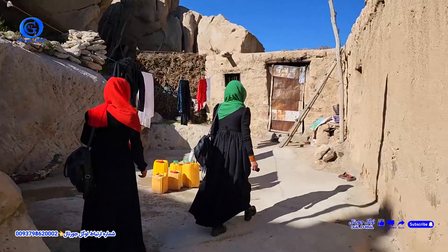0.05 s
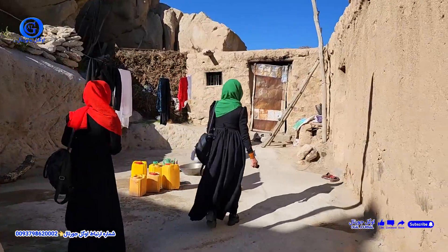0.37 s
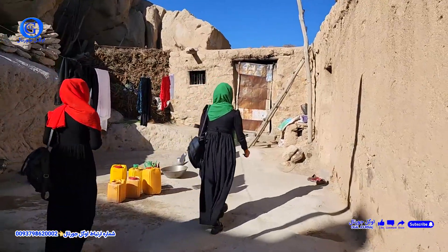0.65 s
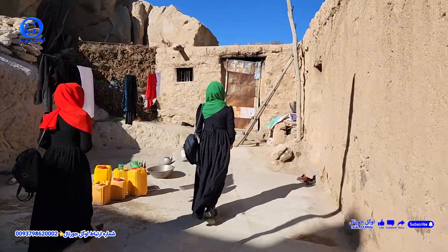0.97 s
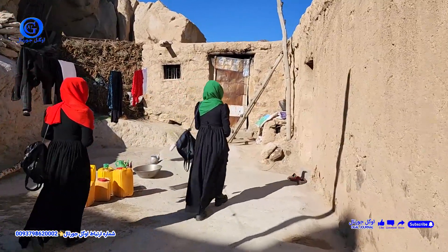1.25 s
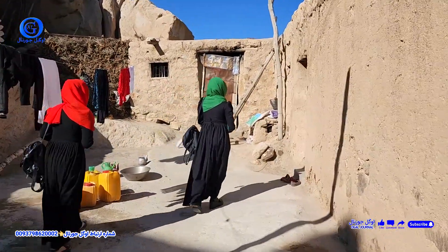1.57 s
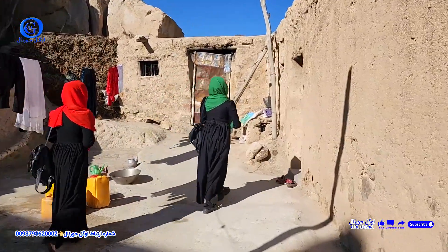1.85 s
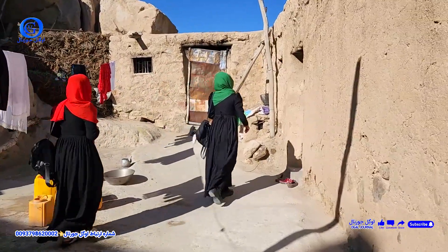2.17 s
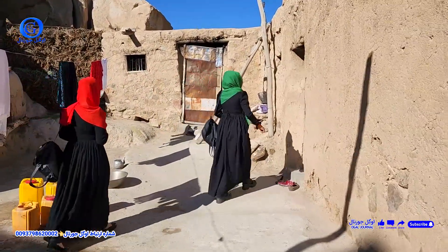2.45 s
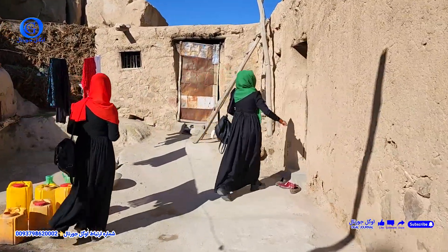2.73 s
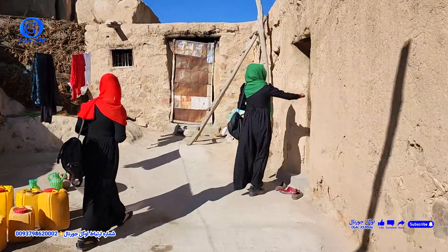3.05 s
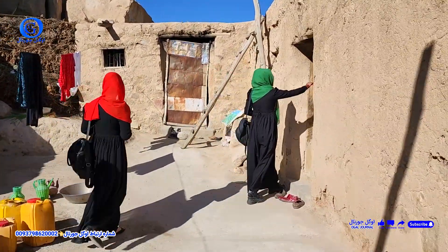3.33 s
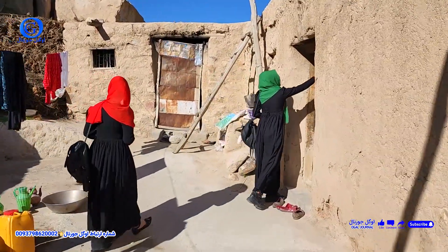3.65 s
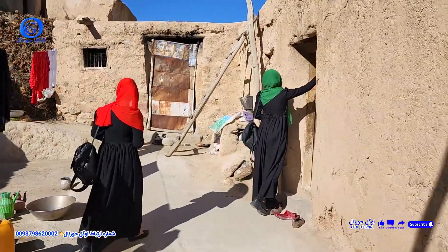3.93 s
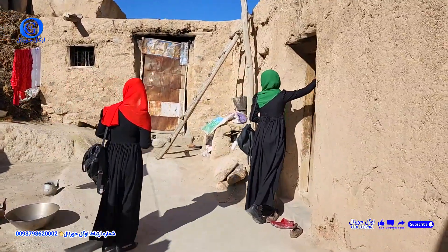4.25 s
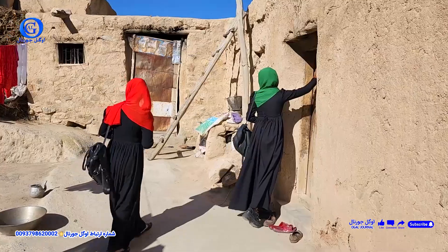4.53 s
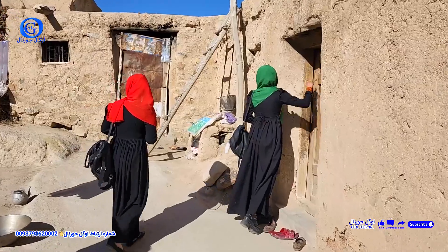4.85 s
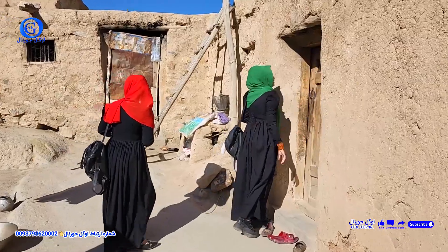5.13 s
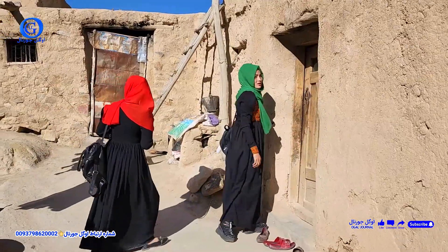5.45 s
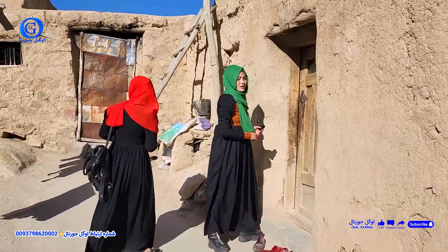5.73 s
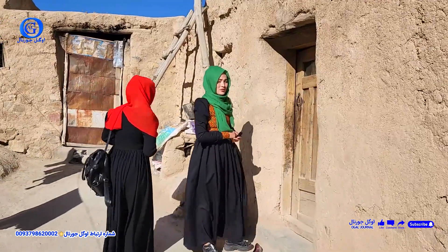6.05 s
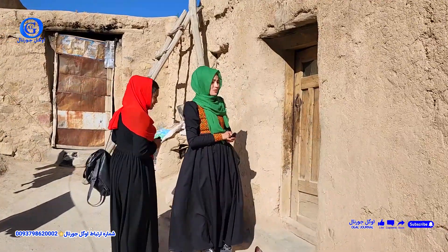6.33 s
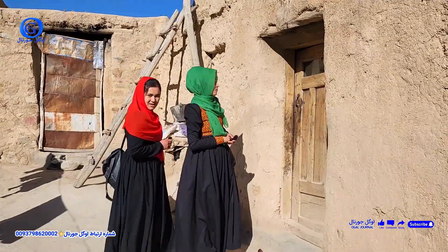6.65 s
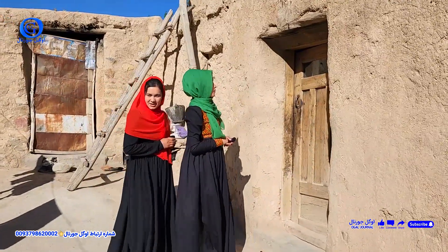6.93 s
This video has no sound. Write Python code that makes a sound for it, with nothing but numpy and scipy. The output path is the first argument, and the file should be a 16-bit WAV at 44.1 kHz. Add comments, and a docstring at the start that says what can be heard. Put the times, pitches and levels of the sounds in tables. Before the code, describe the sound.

Two people walk over dusty ground with swishing skirts, and one raps five times quickly on a rattling plank door.

```python
"""Footsteps and a knock at a wooden door

Two people cross a dusty, mud-walled yard. Their sandals scuff, pat and snap on grit, and their
skirts swish over a soft rustle and a low rumble. One raps five times on a plank door, which booms
and chatters in its frame, and the walls answer. Then they shuffle round and wait. The sound is mono."""
import sys
import numpy as np
from scipy import signal
from scipy.fft import rfft, irfft, next_fast_len
from scipy.io import wavfile
from scipy.ndimage import map_coordinates

SR = 44100
rng = np.random.default_rng(int(sys.argv[2]) if len(sys.argv) > 2 else 0)


def write(x):
    x = np.atleast_2d(x).T
    wavfile.write(sys.argv[1], SR, np.round(np.clip(x, -1, 1) * 32767).astype(np.int16))


N = 317387

# Level of the background rustle, which dips after the knocks: time_s, level_db
RUSTLE_LEVEL = [(0, -55.5), (0.6, -54.5), (0.88, -45.5), (1.3, -47.5), (1.62, -51), (2.06, -50.5),
                (2.5, -50.5), (2.88, -63), (3.45, -50.5), (3.74, -53.5), (3.97, -48), (4.38, -62.5),
                (4.8, -62.5), (5.08, -59.5), (5.82, -55), (6.1, -54), (6.6, -50), (7.2, -50)]
# The tone of the rustle, also used for the crackle in a click: pitch_hz, level_db
RUSTLE_TONE = [(300, -14.5), (900, -1.5), (2000, 0.5), (3800, 1), (6000, -5), (9000, -14.5), (12000, -45.5),
               (16000, -47)]
# The bright tone of fine dust, also used for the crack of a knuckle: pitch_hz, level_db
DUST_TONE = [(2500, -44), (5300, 0.5), (7000, -0.5), (9300, -4), (11500, -11), (16000, -22)]
# The dull tone of the room behind the door, or of earth underfoot: pitch_hz, level_db
THUD_TONE = [(30, -22), (60, -5), (100, -4.5), (200, -4), (400, 2.5), (700, -10), (1200, -16), (3000, -48)]


def amp(db):
    """Turn decibels into a number to multiply a sound by."""
    return 10 ** (np.asarray(db) / 20)


def unit(x):
    """Scale a sound so that its average strength (rms) is 1."""
    return x / np.sqrt(np.mean(x ** 2) + 1e-20)


def along(points, hz):
    """Read between (pitch_hz, value) points, giving each octave the same room."""
    pitches, values = np.transpose(points)
    return np.interp(np.log(hz + 1), np.log(pitches), values)


def fade(t, fade_s):
    """Die away by 60 dB in fade_s seconds."""
    return np.exp(-np.log(1000) * t / fade_s)


def swell(t, rise_s):
    """Rise to 1 in rise_s seconds, then die away."""
    return (t / rise_s) * np.exp(1 - t / rise_s)


def add(track, start_s, sound):
    """Mix a sound into the track at the given time."""
    start = max(round(start_s * SR), 0)
    track[start:start + len(sound)] += sound[:max(N - start, 0)]


def coloured(x, tone):
    """Shape noise with a table of pitch_hz, level_db; the result has strength 1."""
    size = next_fast_len(len(x) + 8192)
    gain = amp(along(tone, np.fft.rfftfreq(size, 1 / SR)))
    return unit(irfft(rfft(x, size) * gain, size)[:len(x)])


def resonant(x, hz, sharpness):
    """Make a sound ring around one pitch; the result has strength 1."""
    return unit(signal.lfilter(*signal.iirpeak(hz, sharpness, SR), x))


def wobble(per_s):
    """A smooth curve through per_s random values each second."""
    return map_coordinates(rng.standard_normal(int(N * per_s / SR) + 4), [np.arange(N) * per_s / SR])


def grains(per_s, spread_db, smooth):
    """Tiny impacts of uneven size on a bed of smooth rubbing noise."""
    size = amp(spread_db * np.clip(rng.standard_normal(N), -2, 1))
    hits = rng.random(N) < per_s / SR
    direction = np.sign(rng.standard_normal(N))
    return unit(hits * direction * size) + smooth * rng.standard_normal(N)


def click(hz, ring_db, slap_db, width_s=0.00043):
    """A dry ring of a few cycles, the single pressure spike of a slap, and a little crackle."""
    t = np.arange(SR // 25) / SR
    ring = np.sin(2 * np.pi * hz * t) * swell(t, 0.00048) ** 3
    spike = np.exp(-((t - 0.0005) / width_s) ** 2)
    slap = signal.lfilter(*signal.butter(1, 350, "high", fs=SR), spike)
    crackle = coloured(rng.standard_normal(len(t)), RUSTLE_TONE) * swell(t, 0.0011)
    return amp(ring_db) * (ring + amp(-18) * crackle) + amp(slap_db) * slap


def rumble_and_rustle():
    """Low outdoor rumble under a rustle and a hiss, which both swell when a skirt swings."""
    # The tone of the outdoor rumble: pitch_hz, level_db
    rumble_tone = [(20, -30), (40, -28), (60, -5), (100, 0), (220, -0.5), (450, -5.5), (900, -11),
                   (2000, -27.5), (6000, -66)]
    # The tone of the fine hiss: pitch_hz, level_db
    hiss_tone = [(5000, -11.5), (8000, -7.5), (10000, -4), (12500, -5.5), (16000, -17)]
    # Swings of a long skirt: start_s, length_s, level_db
    swishes = [(0.817, 0.32, -79), (3.28, 0.2, -56.5), (3.936, 0.19, -52.5), (5.116, 0.21, -62.5),
               (5.98, 0.43, -58), (6.857, 0.42, -56)]
    rustle_db = np.interp(np.arange(N) / SR, *np.transpose(RUSTLE_LEVEL))
    rumble_db = -48 + 0.51 * (rustle_db - rustle_db.mean())  # rises and falls with the rustle
    lumps_db, sway_db = 2 * wobble(25), 1.5 * wobble(30)
    rumble = coloured(rng.standard_normal(N), rumble_tone) * amp(rumble_db + lumps_db)
    swing = np.zeros(N)
    for start_s, length_s, level_db in swishes:
        add(swing, start_s, amp(level_db) * np.sin(np.linspace(0, np.pi, int(length_s * SR))))
    specks = grains(per_s=250, spread_db=8.2, smooth=1.65)
    rustle = coloured(specks, RUSTLE_TONE) * np.hypot(amp(rustle_db + 3), amp(-2.5) * swing)
    hiss = coloured(specks, hiss_tone) * np.hypot(amp(rustle_db - 12), swing)
    return rumble + (rustle + hiss) * amp(sway_db)


def yard_echo(x):
    """Mud walls send back a short, scattered answer that dulls as it dies."""
    # How long the echo takes to fade at each pitch: pitch_hz, fade_s
    fade_times = [(100, 0.67), (400, 0.16), (1500, 0.2), (5000, 0.18), (14000, 0.096)]
    hz, t, bands = signal.stft(rng.standard_normal(SR // 2), SR, nperseg=256)
    tail = signal.istft(bands * fade(t, along(fade_times, hz)[:, None]), SR, nperseg=256)[1]
    tail *= np.clip(np.arange(len(tail)) / SR / 0.02, 0, 1) ** 2  # builds up over 20 ms
    return signal.fftconvolve(x, tail / np.linalg.norm(tail))[:N]


def grit():
    """Grains burst underfoot in sharp spikes; loose ones tick at random, just above the rustle."""
    # A grain of grit or a crumb of earth bursts: start_s, level_db, spike_width_s
    cracks = [(0.82, -17.5, 0.000058), (2.5481, -11.5, .00007), (3.112, -29, 0.000031),
              (3.4324, -16, 0.00003), (3.693, -15.5, 0.000035), (3.8047, -21, 0.00012),
              (4.851, -24, 0.00017), (5.27, -25, 0.000037), (6.0204, -15, 0.000088),
              (6.5766, -11.5, 0.000038), (7.024, -23, 0.000021)]
    ring_hz, ticks_per_s = 3610, 5.1
    out = np.zeros(N)
    for start_s, level_db, width_s in cracks:
        add(out, start_s, click(ring_hz, level_db - 6.5, level_db, width_s))
    for when, softness, pitch in rng.random((int(ticks_per_s * N / SR), 3)):
        start_s = when * N / SR
        level_db = np.interp(start_s, *np.transpose(RUSTLE_LEVEL)) + 13 - 2 * softness
        add(out, start_s, click(ring_hz * (0.8 + 0.6 * pitch), level_db, level_db, width_s=0.00004))
    return out


def heel_pats():
    """A soft, low heel thud that falls quickly in pitch, with a puff of earth and a tick of grit."""
    # Heels land on the packed earth: start_s, level_db, pitch_drop_hz
    landings = [(.413, -36.5, 620), (1.056, -34, 450), (1.709, -36, 344), (1.724, -30.5, 120),
                (2.548, -27, 540), (2.771, -23.5, 546), (2.816, -28.5, 348), (4.852, -40, 620),
                (5.451, -33.5, 417), (6.021, -27, 670), (6.039, -34, 295), (6.093, -33, 297),
                (6.191, -30.5, 348), (6.341, -28, 420), (6.576, -31, 494), (6.634, -30.5, 560),
                (6.753, -33, 504), (6.925, -27, 593)]
    out, t = np.zeros(N), np.arange(SR // 10) / SR
    for start_s, level_db, drop_hz in landings:
        end_hz = 80 * np.exp(0.17 * rng.standard_normal())
        pitch_hz = end_hz + drop_hz * np.exp(-t / 0.0025)
        pat = -np.sin(2 * np.pi * np.cumsum(pitch_hz) / SR) * fade(t, 0.045)
        puff = coloured(rng.standard_normal(len(t)), THUD_TONE) * swell(t, 0.0032)
        add(out, start_s, amp(level_db + 4.5) * (pat + amp(-18) * puff))
        add(out, start_s, click(hz=3800, ring_db=level_db - 3.5, slap_db=level_db - 3.5))
    return out


def sandal_snaps():
    """A sandal snaps against the foot and rings briefly over a soft slap."""
    # Each snap of a sandal: start_s, level_db, pitch_hz
    snaps = [(.3676, -25.5, 2910), (1.1593, -19, 3550), (1.708, -20, 3380), (3.3775, -15, 3530),
             (3.4914, -12.5, 3450), (3.579, -13.5, 3460), (4.0184, -21.5, 4170), (5.576, -28, 3100),
             (5.9445, -29, 3970), (5.9678, -16, 3470), (6.038, -27, 3530), (6.0535, -28, 3600),
             (6.127, -31, 3500), (6.192, -10, 3100), (6.814, -22, 2640)]
    out = np.zeros(N)
    for start_s, level_db, pitch_hz in snaps:
        add(out, start_s, click(pitch_hz, ring_db=level_db, slap_db=level_db - 11))
    return out


def sole_squeaks():
    """Rubber grips and slips on hard ground many times in a row, making a short buzz or squeak."""
    # Each run of quick slips: start_s, length_s, pitch_hz, level_db
    squeaks = [(0.269, 0.023, 940, -37), (1.336, 0.028, 314.5, -28.5), (2.891, 0.04, 1515, -47)]
    out = np.zeros(N)
    for start_s, length_s, pitch_hz, level_db in squeaks:
        progress = np.linspace(0, 1, int(length_s * SR))
        phase = 2 * np.pi * pitch_hz * length_s * progress
        buzz = np.sin(phase) + amp(-21) * sum(np.sin(k * phase) for k in range(2, 7))
        add(out, start_s, amp(level_db) * buzz * np.abs(np.sin(np.pi * progress)) ** 0.5)
    return out


def sole_scuffs():
    """A sliding sole rolls sand and dust; its hollow and the gap under it ring with the grains."""
    # Soles drag over the dust: start_s, rise_s, length_s, level_db, weight_db, dust_db, sand_pitch_hz
    strokes = [(0.081, .025, 0.046, -50, 2.5, -6, 3500), (0.243, 0.031, 0.15, -48, 3, -15, 2700),
               (0.349, 0.01, 0.041, -44.5, 0.5, -9, 3000), (0.687, 0.017, 0.091, -41.5, 3, 1, 2950),
               (0.895, 0.058, 0.089, -42, 1, -3.5, 3080), (1.156, 0.0026, 0.017, -32, 7, 2.5, 3500),
               (1.169, 0.018, 0.089, -33, 4, .5, 3720), (1.328, 0.0047, 0.047, -45.5, 5, 2, 3720),
               (1.697, .008, 0.2, -36, -8, -14, 3240), (1.847, 0.055, 0.15, -39, -2.5, 8, 4500),
               (1.9, 0.049, 0.12, -33, -5, -8.5, 3240), (2.112, 0.068, 0.34, -40.5, -2, -12.5, 3000),
               (2.621, 0.0089, 0.14, -52.5, 6, -1.5, 3400), (3.035, .07, 0.17, -42.5, -9, -10, 4130),
               (3.201, 0.013, 0.093, -38.5, -14.5, -11, 4200), (3.605, 0.079, 0.084, -44, -11, -4.5, 3560),
               (3.796, 0.0099, 0.056, -36.5, 0, -3.5, 3470), (4.262, .02, 0.12, -51, -6, -6, 3700),
               (4.465, 0.03, 0.15, -47, 1.5, -9.5, 3340), (4.632, 0.017, 0.14, -49, -4, -9.5, 3460),
               (5.15, 0.021, 0.095, -52, -6, -6, 3680), (5.897, 0.044, 0.14, -42, -11, -3, 4100),
               (6.013, 0.011, 0.091, -45.5, -9, -6.5, 4200), (6.174, 0.021, 0.16, -44, 1.5, -4, 3350),
               (6.329, 0.015, 0.081, -40, -4.5, -8.5, 2660), (6.62, 0.013, 0.03, -44.5, 1, -13, 3000),
               (6.825, 0.075, 0.12, -42, -9.5, -6, 3100)]
    # A trapped pebble skids and rings: start_s, length_s, pitch_hz, level_db
    skids = [(0.722, 0.076, 3330, -31), (3.964, 0.16, 3470, -40)]
    # The tones of the sole's hollow, of its rubbing and of the sand: pitch_hz, level_db
    hollow_tone = [(60, -23), (150, -6), (230, -0.5), (330, 3), (420, 0), (540, 0), (700, -13),
                   (1400, -35.5)]
    rub_tone = [(250, -71), (650, 2.5), (1000, -2), (1800, -1.5), (2400, -5.5), (4500, -41)]
    sand_tone = [(1000, -40), (2200, -1.5), (3400, -4.5), (4600, -3), (6000, -10.5), (10000, -35)]
    out, t = np.zeros(N), np.arange(N) / SR
    hollow = coloured(grains(per_s=1500, spread_db=2.2, smooth=0.31), hollow_tone)
    rub = coloured(grains(per_s=2000, spread_db=2.9, smooth=1.0), rub_tone)
    sand = coloured(grains(per_s=1200, spread_db=3, smooth=0.5), sand_tone)
    dust = coloured(grains(per_s=2700, spread_db=3.2, smooth=0.63), DUST_TONE)
    for start_s, rise_s, length_s, level_db, weight_db, dust_db, sand_hz in strokes:
        span = slice(int(start_s * SR), int((start_s + length_s) * SR))
        release_s = rise_s + 0.47 * (length_s - rise_s)
        pressure = np.interp(t[span] - start_s, [0, rise_s, release_s, length_s], [0, 1, 1, 0]) ** 0.77
        # weight on the foot brings out both the hollow and the rubbing
        body = amp(weight_db - 2.5) * hollow[span] + amp(0.76 * weight_db - 1) * rub[span]
        scrape = resonant(sand[span], sand_hz, sharpness=2.24) + amp(dust_db) * dust[span]
        # reflections from shoe and ground colour every stroke differently
        delays_s = rng.uniform(0.0004, 0.005, size=3)
        scrape += sum(0.23 * np.roll(scrape, int(delay * SR)) for delay in delays_s)
        add(out, start_s, amp(level_db) * pressure * (body + scrape))
    for start_s, length_s, pitch_hz, level_db in skids:
        arch = np.sin(np.linspace(0, np.pi, int(length_s * SR)))
        add(out, start_s, amp(level_db) * arch * resonant(sand, pitch_hz, sharpness=9)[:len(arch)])
    return out * amp(-0.5 + 1.04 * wobble(110))  # the sole catches and lets go


def door_knocks():
    """Each rap bends the planks in a wave that bounces back, rings the door and shakes the frame."""
    # Knuckles on the door, five raps and two faint touches:
    # start_s, level_db, blow_pitch_hz, rise_s, boom_db, bright_db, favoured_pitch_hz
    raps = [(3.869, 0, 443, .0009, -2.5, -18, 1620), (4.060, 1.5, 465, 0.0014, -1.5, -0.5, 2076),
            (4.2144, -44, 620, 0.0014, -15, -13, 740), (4.235, -2, 481, 0.0023, 2, 3, 792),
            (4.428, -4.5, 517, 0.00096, -1.5, 5, 1077), (4.5913, -28.5, 700, .001, -8, -20, 730),
            (4.61, -1.5, 511, 0.0016, -25, 4.5, 403)]
    # The door's own ringing notes: pitch_hz, level_db, fade_s
    door_notes = [(95.2, -31.5, 0.36), (147, -33, 0.15), (204.7, -24.5, 0.38), (230, -14, 0.14),
                  (281, -4.5, 0.053), (339, -28, 0.2), (393.3, -18.5, 0.2), (481, -22, 0.11),
                  (494, -28, 0.038), (603.6, -8.5, 0.098), (617, -42, 0.19), (766, -13.5, 0.082),
                  (826, -24, 0.12), (1027, -5.5, 0.059), (1108, -20.5, 0.08), (1212, -6, 0.025),
                  (1426, -19, 0.087), (1526, -13, 0.049), (1690, -20, 0.077), (1732, -13.5, 0.034),
                  (2120, -25.5, 0.089), (2390, -30, 0.096), (2440, -18.5, 0.029), (2730, -20.5, 0.05),
                  (3240, -19, 0.058), (3550, -33, 0.049), (4300, -15, 0.029)]
    # The tone of the door chattering in its frame: pitch_hz, level_db
    chatter_tone = [(200, 6), (700, 10.5), (1500, 6.5), (3500, 1), (5500, -7), (9000, -28.5), (16000, -38)]
    out, t = np.zeros(N), np.arange(SR // 2) / SR
    note_hz, note_db, fade_s = np.transpose(door_notes)
    direction = -(-1) ** np.arange(len(note_hz))  # neighbouring notes swing opposite ways
    boom_share = along([(280, 0.88), (400, 0.16)], note_hz)
    bright_share = along([(600, 0), (1000, 0.82)], note_hz)
    for start_s, level_db, blow_hz, rise_s, boom_db, bright_db, favoured_hz in raps:
        blow = -amp(level_db - 3) * np.sin(2 * np.pi * blow_hz * t) * swell(t, rise_s)
        add(out, start_s, blow)
        add(out, start_s + 2.13 / blow_hz, 0.7 * blow)  # back from the edge after 2.13 cycles
        # the spot that is struck favours the notes near one pitch
        spot_db = 16.5 * np.exp(-(np.log(note_hz / favoured_hz) / 0.025) ** 2)
        struck_db = note_db + boom_db * boom_share + bright_db * bright_share + spot_db
        gains = direction * amp(struck_db + rng.standard_normal(len(note_hz)))
        pitch_hz = note_hz * (1 + 0.0084 * rng.standard_normal(len(note_hz)))
        notes = np.sin(2 * np.pi * pitch_hz[:, None] * t) * fade(t, fade_s[:, None])
        ring = gains @ notes * (1 - np.exp(-t / 0.0063))  # the notes need a moment to build
        # a swinging panel shakes the frame; a crisp rap hardly does
        chatter_db = -10 + 0.37 * boom_db - 0.3 * bright_db
        chatter = coloured(rng.standard_normal(len(t)), chatter_tone)
        chatter *= (1 - np.exp(-t / 0.0069)) * fade(t, 0.077)
        room_boom = coloured(rng.standard_normal(len(t)), THUD_TONE)
        room_boom *= (1 - np.exp(-t / 0.0095)) * fade(t, 0.28)
        knuckle = coloured(rng.standard_normal(len(t)), DUST_TONE) * swell(t, 0.006)
        clatter = amp(chatter_db) * (chatter + amp(-26) * knuckle)
        add(out, start_s, amp(level_db) * (amp(0.3) * ring + clatter + amp(-20.5) * room_boom))
    return out


def scene():
    """Door, feet and their echo over the rumble and rustle, the same in both channels."""
    door = door_knocks()
    feet = sole_scuffs() + sole_squeaks() + sandal_snaps() + grit() + heel_pats()
    echo = yard_echo(amp(-21.5) * door + amp(-21) * feet)
    mono = door + feet + echo + rumble_and_rustle()
    return np.array([mono, mono])


def record(dry):
    """The microphone drops the deepest bass; hard peaks are rounded and the highest treble is cut."""
    bottom_hz, top_hz = 46, 16000
    thin = signal.lfilter(*signal.butter(4, bottom_hz, "high", fs=SR), dry)
    rounded = thin / (1 + np.abs(thin) ** 8) ** (1 / 8)
    size = next_fast_len(N + SR // 2)
    kept = np.fft.rfftfreq(size, 1 / SR) < top_hz
    return irfft(rfft(rounded, size) * kept, size)[:, :N]


dry = scene()
out = record(dry)
write(out)
```